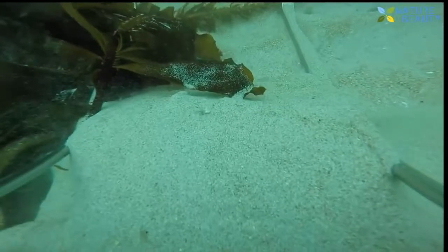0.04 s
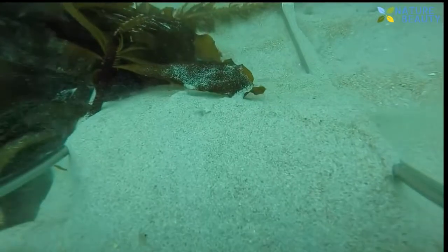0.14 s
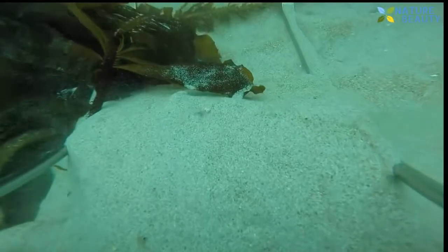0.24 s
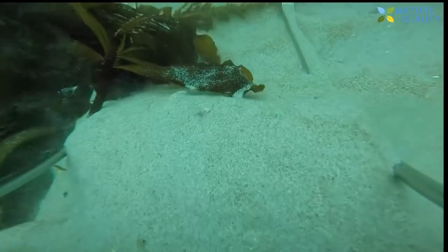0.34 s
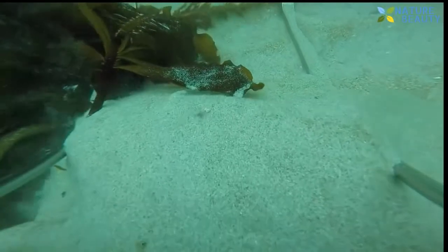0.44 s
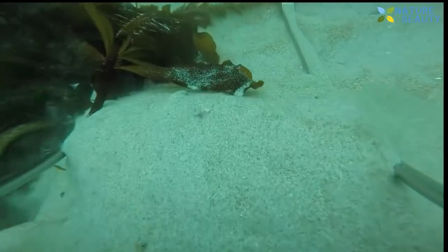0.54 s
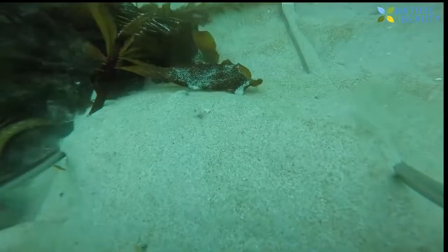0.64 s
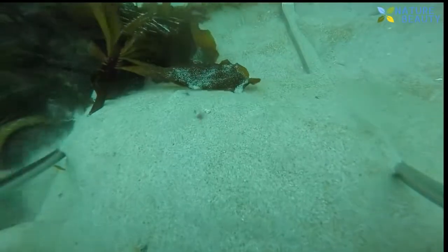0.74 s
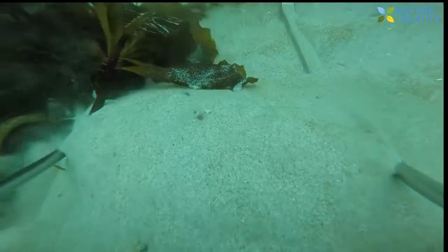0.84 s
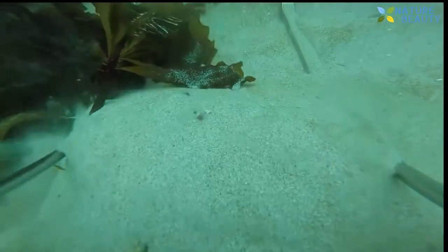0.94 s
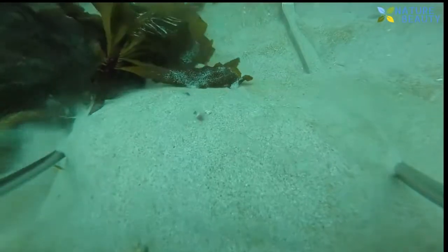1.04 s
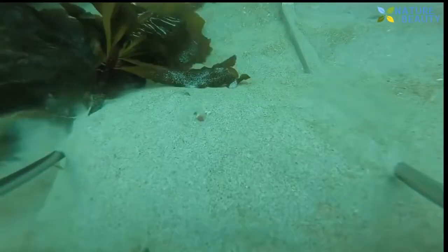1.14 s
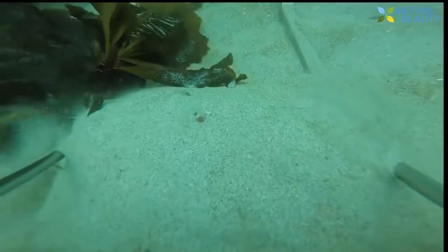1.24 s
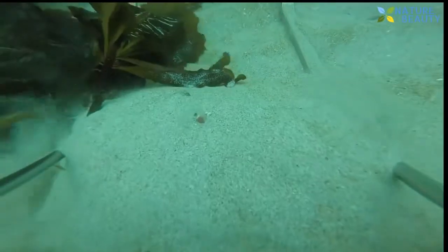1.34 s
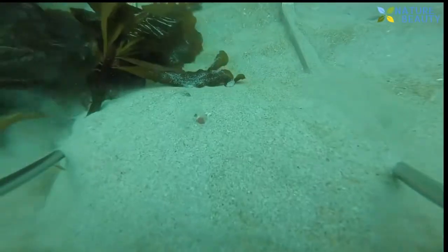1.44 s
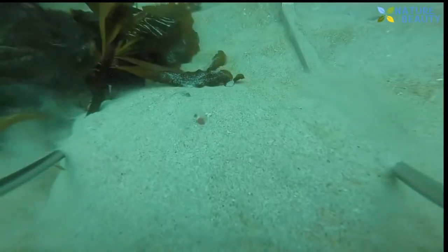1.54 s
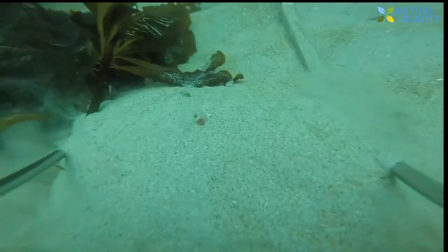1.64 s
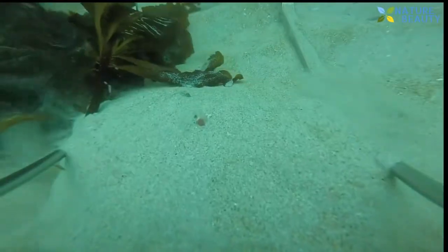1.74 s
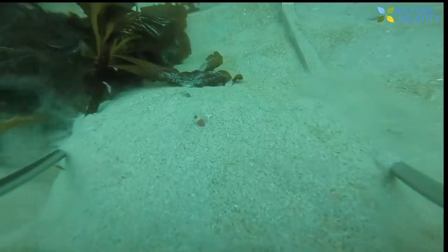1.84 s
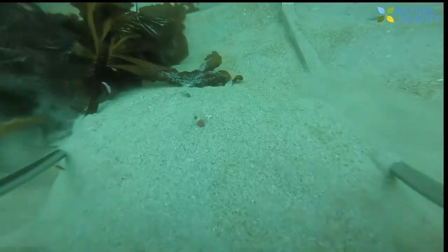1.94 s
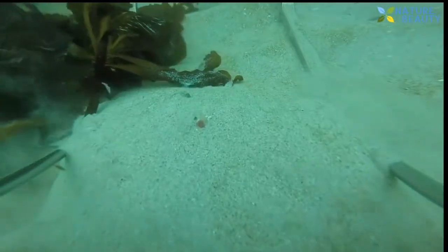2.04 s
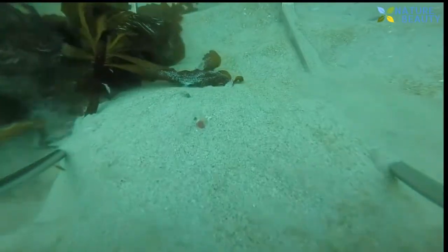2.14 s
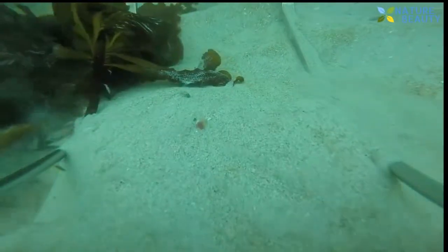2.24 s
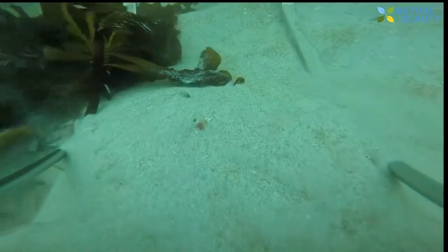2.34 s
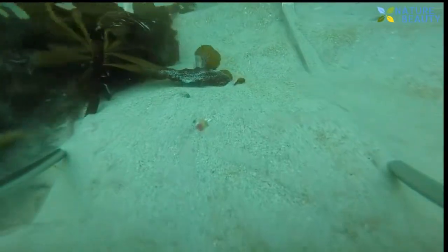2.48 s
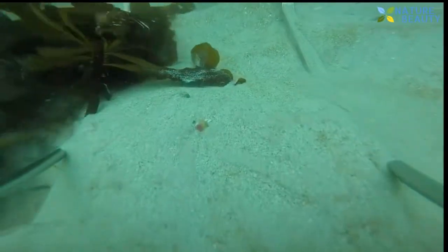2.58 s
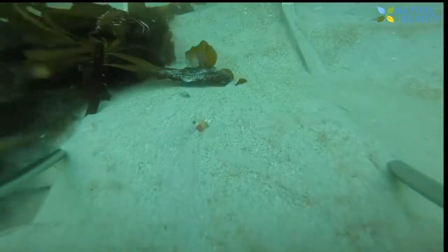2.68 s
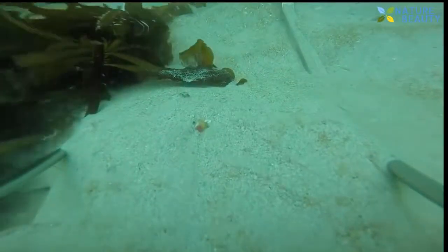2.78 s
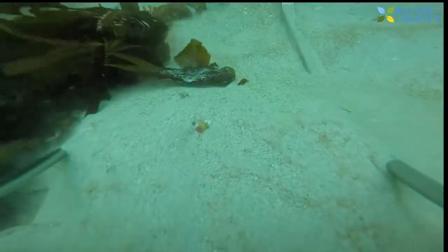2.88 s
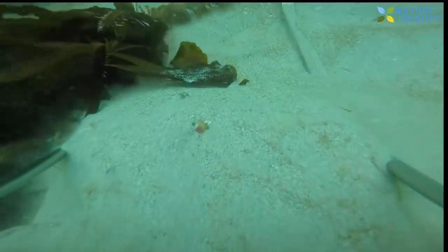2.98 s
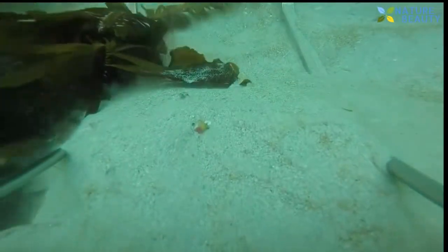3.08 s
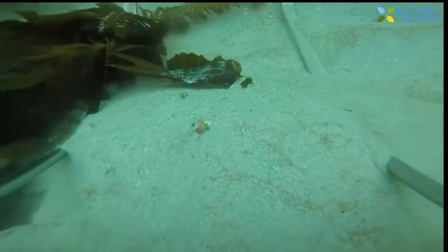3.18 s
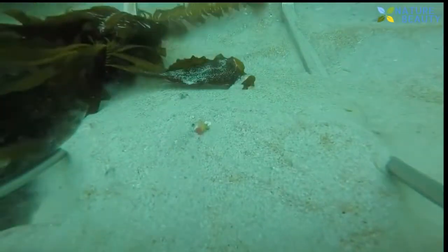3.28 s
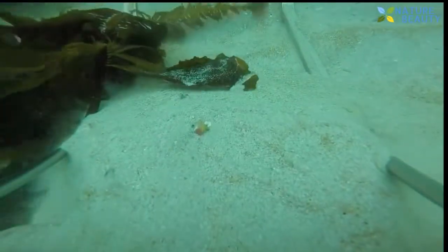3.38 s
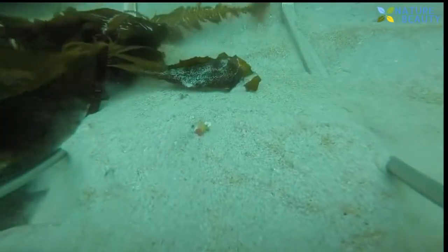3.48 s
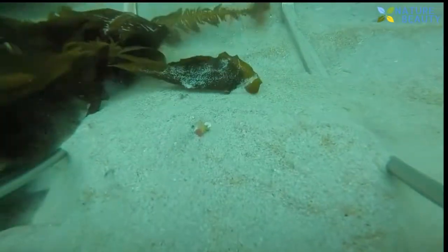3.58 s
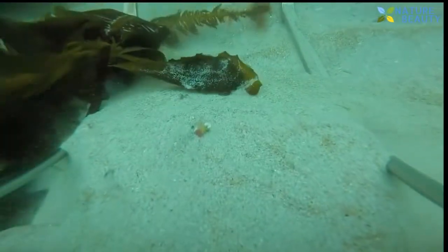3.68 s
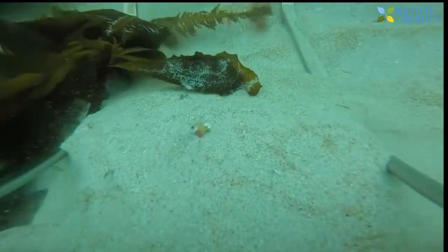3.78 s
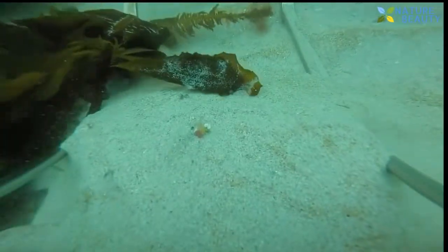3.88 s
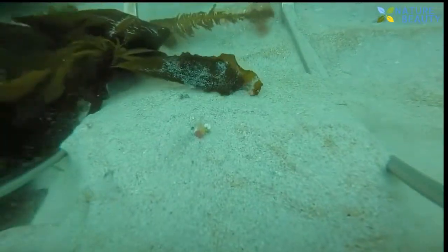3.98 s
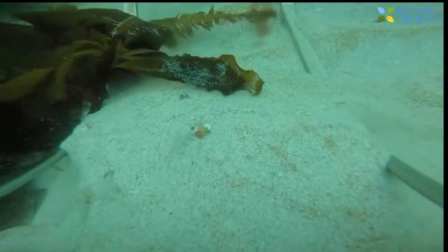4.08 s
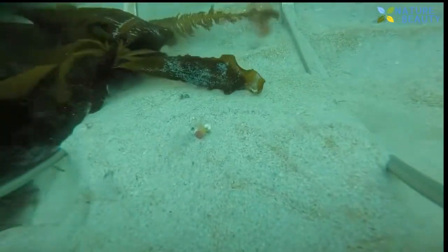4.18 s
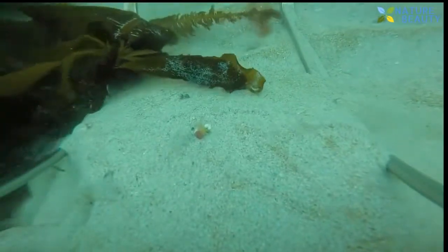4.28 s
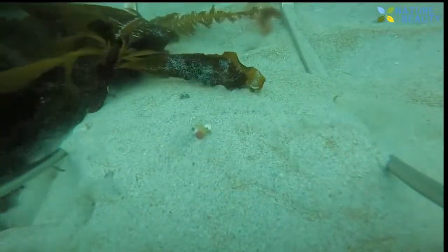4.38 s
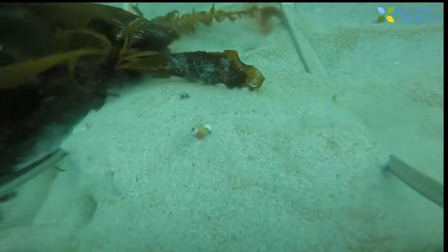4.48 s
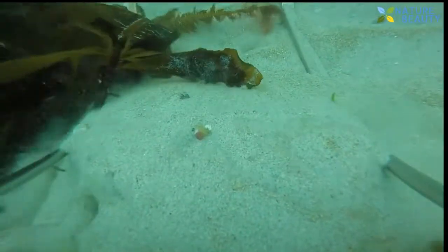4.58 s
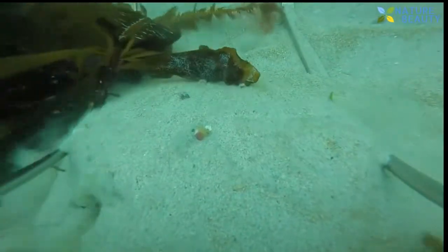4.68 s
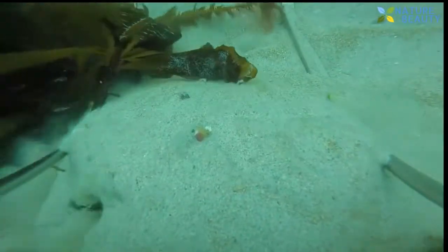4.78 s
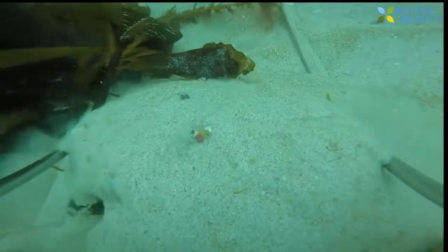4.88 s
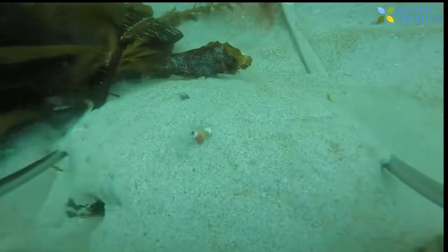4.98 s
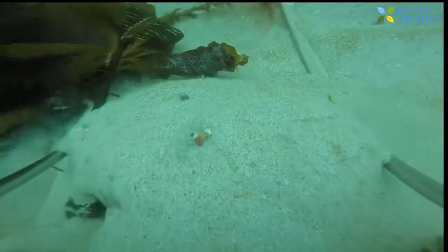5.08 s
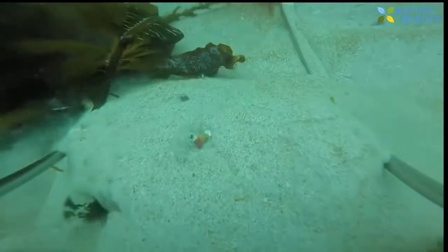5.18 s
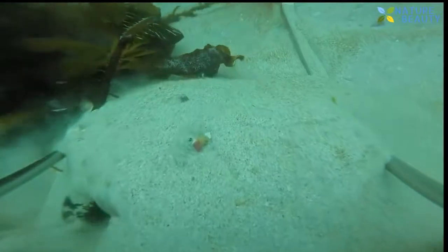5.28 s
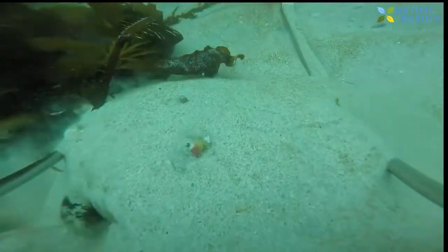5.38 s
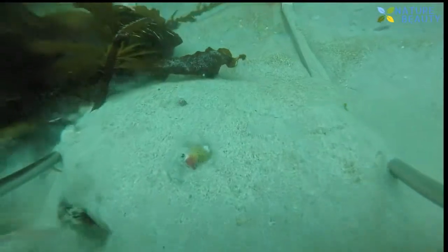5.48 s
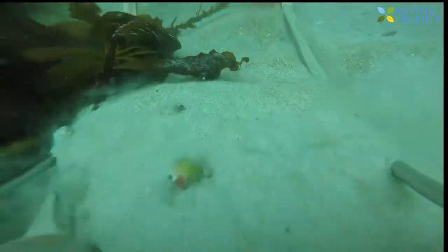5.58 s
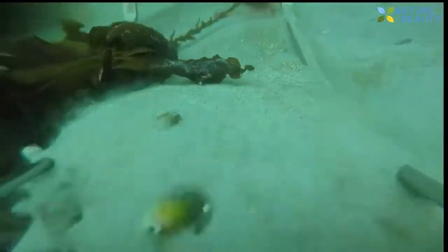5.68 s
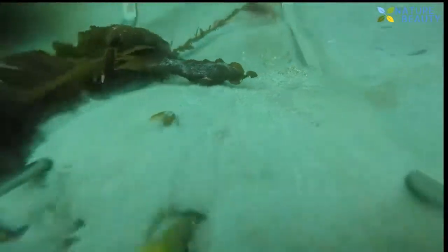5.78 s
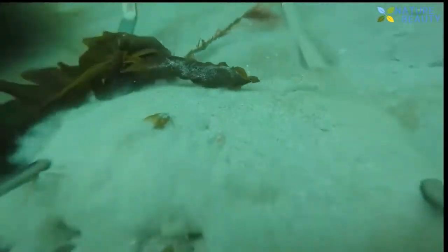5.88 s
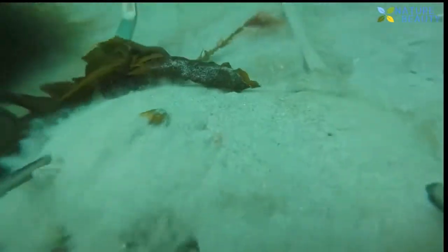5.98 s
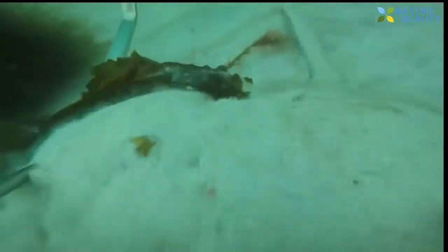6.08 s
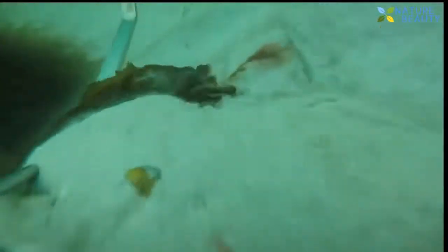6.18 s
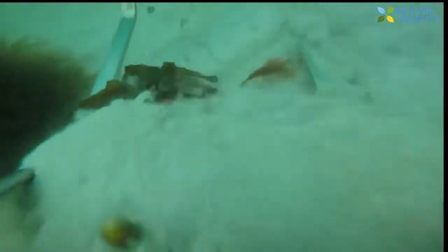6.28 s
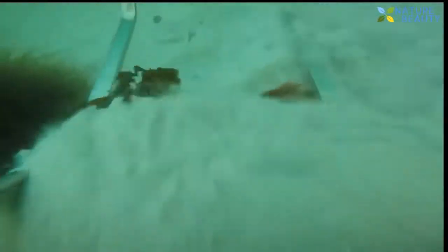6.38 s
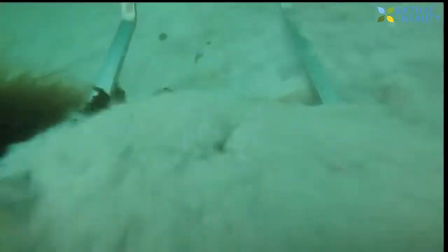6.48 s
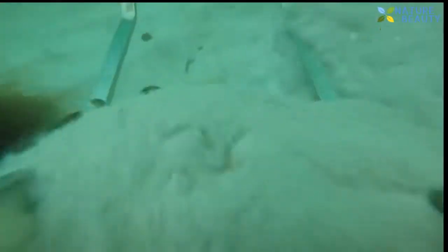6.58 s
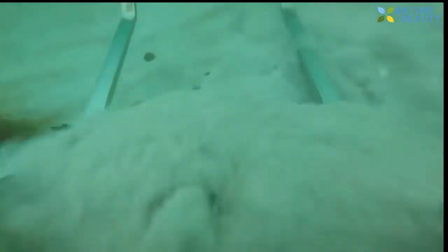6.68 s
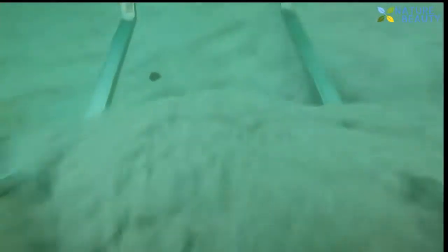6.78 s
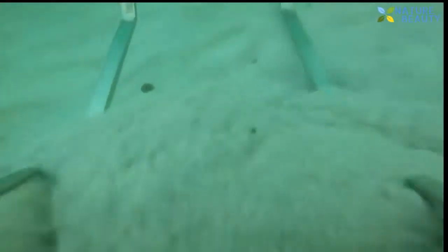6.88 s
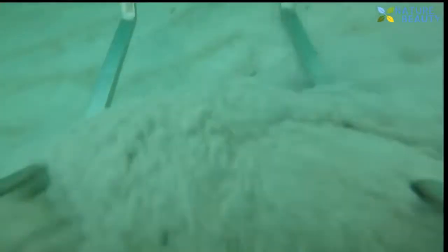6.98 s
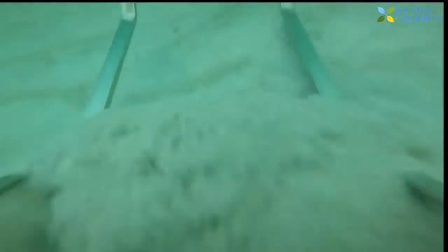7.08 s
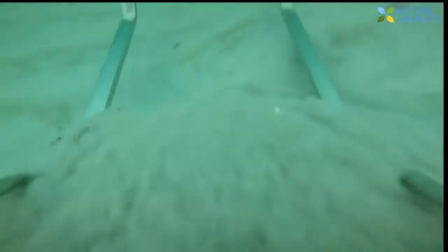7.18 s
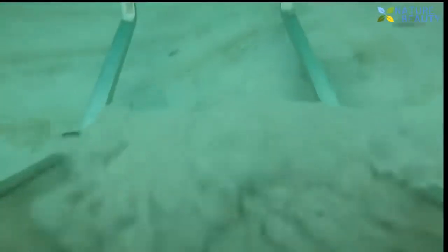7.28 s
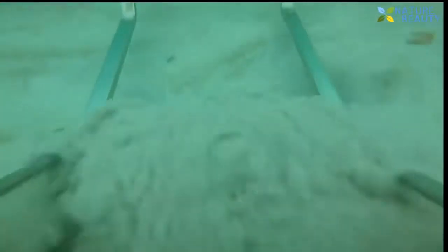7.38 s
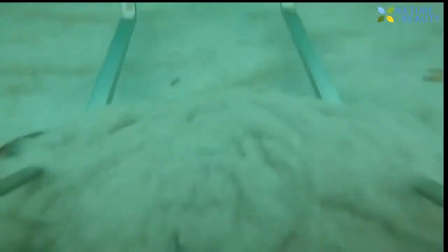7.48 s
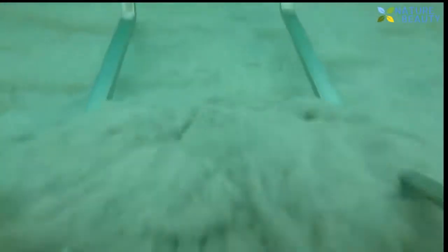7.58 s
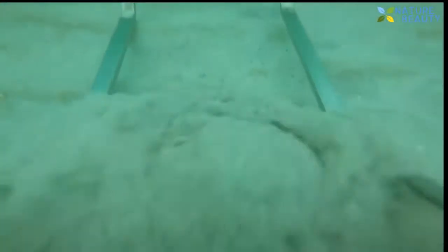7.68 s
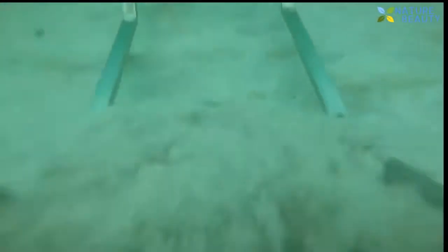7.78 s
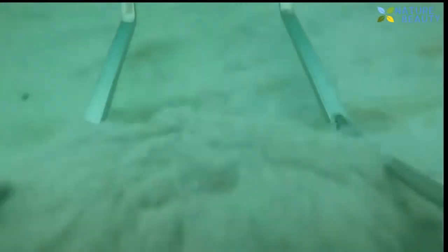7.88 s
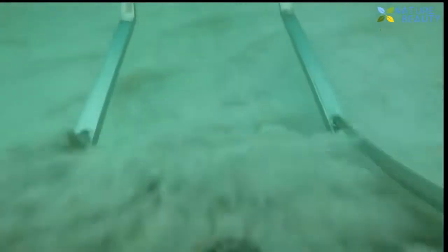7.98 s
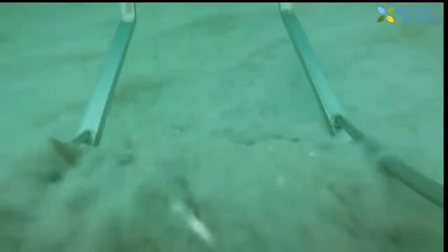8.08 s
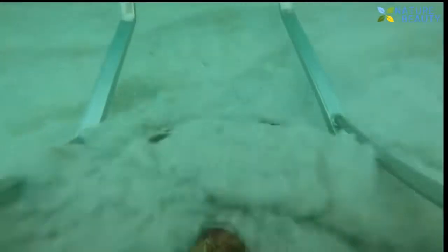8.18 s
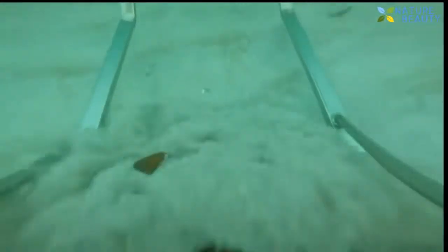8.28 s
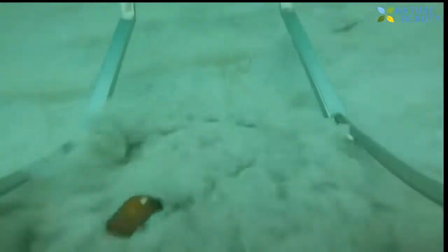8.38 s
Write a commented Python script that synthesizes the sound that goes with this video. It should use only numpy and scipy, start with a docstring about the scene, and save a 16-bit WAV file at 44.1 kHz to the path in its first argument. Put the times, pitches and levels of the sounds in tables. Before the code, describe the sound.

Underwater, a boat engine drones at idle, revs up, then fades beneath loud jerky scraping of steel teeth through sand and sharp shell knocks.

```python
"""Under water, on a clam dredge: the towing boat's engine idles while the teeth scrape through sand,
knock twice near the start and bump softly on buried stones. At about 4.5 s the engine revs up and the
tow takes hold; from 5.2 s the drone sinks away under loud raking. From 5.9 s the teeth go in jerks,
with many knocks on shells and stones and a few squeaks, and the steel frame rings and shudders.
Engine tones are cosines; the rest is mostly noise, grains and blows passed through resonances."""
import sys
import numpy as np
from scipy import signal
from scipy.fft import rfft, irfft
from scipy.io import wavfile
from scipy.ndimage import uniform_filter1d

SR = 44100
rng = np.random.default_rng(int(sys.argv[2]) if len(sys.argv) > 2 else 0)


def log_audio(samples):
    """Write samples as a 16-bit WAV file to the path given in sys.argv[1]."""
    # one column per channel
    frames = np.atleast_2d(samples).T
    # limit to full scale, then quantise
    limited = np.clip(frames, -1, 1)
    pcm = np.round(limited * 32767).astype(np.int16)
    wavfile.write(sys.argv[1], SR, pcm)


N = 372204
TIME = np.arange(N) / SR  # seconds


def amp(db):
    """Turns decibels into a gain."""
    return 10 ** (np.asarray(db) / 20)


def evened(x):
    """Scales a sound to an average (rms) level of one."""
    return x / np.sqrt(np.mean(x ** 2) + 1e-20)


def curve(rows, axis=1):
    """Draws straight lines through one column of a table, giving a value at every sample."""
    columns = np.transpose(rows)
    return np.interp(TIME, columns[0], columns[axis])


def read(points, hz):
    """Reads a (frequency, level) table at any pitch, on a logarithmic frequency axis."""
    point_hz, db = np.transpose(points)
    return np.interp(np.log(hz + 1), np.log(point_hz), db)


def add(mix, start_s, sound):
    """Mixes a short sound in at a given time."""
    part = mix[max(round(start_s * SR), 0):][:len(sound)]
    part += sound[:len(part)]


def band(x, lo_hz, hi_hz):
    """Keeps only the pitches between two limits."""
    return signal.sosfilt(signal.butter(2, [lo_hz, hi_hz], "band", fs=SR, output="sos"), x)


def wander(rate_hz):
    """Slow random drift of unit size: noise with its quick changes smoothed away."""
    hz = np.fft.rfftfreq(N, 1 / SR)
    slow = rfft(rng.standard_normal(N)) * np.exp(-(hz / rate_hz) ** 2)
    return evened(irfft(slow, N))


def response(colour, modes, ring=0.84, size=8192):
    """How a body answers a single tap: a broad colour, lifted at its resonances and faded out."""
    hz = abs(np.fft.fftfreq(size, 1 / SR))
    lifts = sum(lift / (1 + (2 * (hz - mode_hz) / width) ** 2) for mode_hz, width, lift in modes)
    log_gain = np.log(amp(read(colour, hz) + ring * lifts))
    # this phase lets the sound start at the tap, never before it
    spectrum = np.exp(np.conj(signal.hilbert(log_gain)))
    taps = np.fft.ifft(spectrum).real
    return taps[:size // 2] * np.hanning(size)[size // 2:]


def through(x, taps):
    """Passes a sound through a body's response."""
    return signal.oaconvolve(x, taps)[:len(x)]


# the idling engine hunts a little: (time [s], firing rate [firings/s])
IDLE_SPEED = [(0, 42.7), (.65, 42.8), (1.32, 41.4), (1.88, 42.8), (2.15, 42.1), (2.65, 43.5), (3.2, 42.8),
              (3.5, 41.2), (3.72, 41.3), (3.97, 43), (4.4, 42.7)]
# the throttle opens: middle of the run-up [s], its time constant [s], average rate under tow [firings/s]
REV_S, REV_LAG_S, TOW_HZ = 4.515, 0.039, 76.4


def engine_speed(strain=.008):
    """Firings a second: the engine idles, then runs up in one smooth step and wavers under the tow."""
    idle = curve(IDLE_SPEED)
    tow = TOW_HZ * (1 + strain * wander(5))
    throttle = (1 + np.tanh((TIME - REV_S) / (2 * REV_LAG_S))) / 2
    return idle + (tow - idle) * throttle


# colour of the hiss: (frequency [Hz], relative level [dB per Hz])
HISS_COLOUR = [(100, 13), (250, -0.5), (400, -1), (600, -5), (900, -3), (1500, 0.5), (2100, -0.5),
               (2700, -0.5), (3300, 3), (3900, -5), (4500, -17.5), (6800, -26), (8800, -20), (15000, -36)]
# resonances that colour the hiss: (frequency [Hz], width [Hz], lift before the ring factor [dB])
HISS_MODES = [(616, 160, 13.5), (837, 74, 15), (1104, 33, 8), (1990, 250, 8), (3140, 760, 5), (4700, 90, 8),
              (5340, 70, 5.5), (7580, 100, 12), (14300, 320, 15)]
# the hiss between 2800 and 4200 Hz, before the trim: (time [s], level [dB])
HISS_LEVEL = [(0, -47), (.7, -51.5), (1.95, -46), (2.3, -48), (4.3, -49.5), (4.47, -43.5), (5.1, -39.5),
              (5.9, -37.5), (6.12, -63), (8.44, -60)]
# tones of the gears: (multiple of the firing rate, relative level [dB])
GEAR_TONES = [(20, -6.5), (20.5, -13), (26, -7.5)]
# the gear whine as a whole: (time [s], level [dB])
WHINE_LEVEL = [(0, -37.5), (1, -51.5), (2, -54.5), (3, -43.5), (4.1, -40), (4.6, -49), (8.44, -100)]


def machinery(turns, flicker_db=1.2, trim_db=-1.14):
    """Hiss and gear whine of the engine; the hiss chuffs once in every four firings."""
    chuff_db = 2.8 * np.cos(np.pi * turns / 4) ** 4
    noise = rng.standard_normal(N) * amp(chuff_db + flicker_db * wander(54))
    hiss = through(noise, response(HISS_COLOUR, HISS_MODES))
    hiss /= np.std(band(hiss, 2800, 4200))
    whine = np.zeros(N)
    for multiple, db in GEAR_TONES:
        # a random complex size makes the tone waver in strength and phase
        unsteady = wander(32) + 1j * wander(48)
        whine += amp(db) * (unsteady * np.exp(2j * np.pi * multiple * turns)).real
    return amp(curve(HISS_LEVEL) + trim_db) * hiss + amp(curve(WHINE_LEVEL)) * whine / np.sqrt(2)


# the hull booms at one pitch: (frequency [Hz], width [Hz])
HULL_BOOM = (86.5, 43.6)
# an order sitting right on the boom, before throb and sinking: (time [s], level [dB])
HULL_BOOM_LEVEL = [(0, -26.5), (.3, -22), (.47, -27), (.85, -22.5), (2.08, -20.5), (2.17, -26.5),
                   (2.5, -28.5), (2.93, -25.5), (3.3, -22), (4.45, -21.5), (4.88, -21), (5.02, -26)]
# buzz of the engine: (multiple of the firing rate, relative level at idle [dB], at towing speed [dB])
ENGINE_ORDERS = [(1, -3, -9), (2, -19, -2.5), (3, -5, -10.5), (4, -8, -19), (5, -21.5, -16.5)]
BUZZ_DB = -37.5  # added to the relative levels above
# once the teeth bite, the drone sinks away: start [s], rate [dB/s], depth [dB]
SINK_S, SINK_DB_PER_S, SINK_DEPTH_DB = 5.2, 18.5, 35


def drone(speed, turns, flutter=0.086, unsteady=0.44, uneven_db=-27):
    """Orders of the firing rate; the second, and after revving the first, sits on the hull's boom."""
    boom_hz, boom_width_hz = HULL_BOOM
    boom = amp(curve(HULL_BOOM_LEVEL))
    out = np.zeros(N)
    for order, idle_db, towing_db in ENGINE_ORDERS:
        on_boom = 1 / (1 + (2 * (order * speed - boom_hz) / boom_width_hz) ** 6)
        order_db = np.interp(speed, [IDLE_SPEED[0][1], TOW_HZ], [idle_db, towing_db])
        booming = boom * on_boom * (1 + flutter * wander(48))
        buzzing = amp(BUZZ_DB + order_db) * (1 + unsteady * wander(14))
        out += (booming + buzzing) * np.cos(2 * np.pi * (order * turns + rng.random()))
    # unequal cylinders make the drone throb once in four firings
    throb = 1 + 2 * amp(uneven_db) * np.cos(np.pi * turns / 2)
    sunk_db = np.clip(SINK_DB_PER_S * (TIME - SINK_S), 0, SINK_DEPTH_DB)
    return np.sqrt(2) * out * throb * amp(-sunk_db)


# grit sticks and slips along the steel:
# (time [s], length [s], middle pitch [Hz], peak level before trim and scatter [dB])
GRIT_SQUEAKS = [(6.224, .004, 4900, -28.5), (6.363, .008, 3260, -21.5), (6.459, .018, 4860, -32),
                (6.64, .024, 7000, -42), (6.885, .004, 8300, -31), (7.17, .008, 6300, -32),
                (7.803, 0.055, 9100, -40)]


def squeaks(ring_s=0.00075, scatter=0.099, trim_db=-3):
    """Each slip of a grain is one tiny tick at a slightly different pitch."""
    out = np.zeros(N)
    t = TIME[:512]
    tick = t / ring_s * np.exp(1 - t / ring_s)
    for start, length, hz, db in GRIT_SQUEAKS:
        slips = np.arange(0, length, .0042)  # one slip every 4.2 ms, before the random lateness
        for slip, (late, pitch, size) in zip(slips, rng.standard_normal((32, 3))):
            tone = np.sin(2 * np.pi * hz * (1 + scatter * pitch) * t)
            add(out, start + slip + 0.00087 * late, amp(db + trim_db + 2 * size) * tick * tone)
    return out


# resonances of the steel frame, also rung by the scraping and the knocks:
# (frequency [Hz], width [Hz], lift before the ring factor [dB])
FRAME_MODES = [(350, 55, 6), (487, 55, 10), (530, 35, 4), (580, 40, 11), (645, 55, -5), (720, 50, 8),
               (825, 60, 3), (985, 60, 2), (1205, 60, 3), (1890, 170, 9), (2465, 110, 6), (4920, 100, 3),
               (6200, 400, 5), (8650, 900, 5)]
# colour of a bump: (frequency [Hz], relative level [dB per Hz])
DULL_COLOUR = [(60, 12), (130, 8), (250, -18), (420, -23), (560, 4.5), (750, -6.5), (1200, -19.5),
               (2300, -10), (3500, -25), (12000, -61)]
# stones bump softly under the sand: (time of the middle [s], level [dB])
STONE_BUMPS = [(1.071, -30), (1.15, -27.5), (1.499, -37), (1.85, -31.5), (2.05, -32), (2.17, -31),
               (2.41, -32), (4.5, -35), (4.789, -33.5)]


def bumps(length_s=0.063):
    """A buried stone pushes on a tooth: a dull swell of noise in the frame's low resonances."""
    out = np.zeros(N)
    taps = response(DULL_COLOUR, FRAME_MODES)
    swell = np.hanning(int(length_s * SR))
    for middle, db in STONE_BUMPS:
        ring = through(rng.standard_normal(SR // 4), taps)[-len(swell):]
        add(out, middle - length_s / 2, amp(db) * swell * evened(ring))
    return out


# the steady drag through the sand:
# (time [s], level of the scraping before its trim [dB], level of the frame's shudder [dB])
STEADY_DRAG = [(0, -29, -28.5), (.2, -30, -38), (.75, -37.5, -36), (1.3, -39.5, -40), (1.7, -55, -52),
               (2.1, -37.5, -34), (2.7, -41, -45), (3.9, -40.5, -45), (4.45, -45.5, -48), (5.18, -32, -29),
               (5.42, -22, -21), (5.84, -14.5, -17.5), (6.04, -27.5, -28), (6.11, -44, -33),
               (6.27, -41.5, -33), (6.4, -31.5, -24.5), (7.8, -33.5, -27.5), (8.3, -38.5, -32)]
# the teeth catch and tear free, levels before the sag:
# (start [s], length [s], level of the scraping before its trim [dB], level of the shudder [dB])
TOOTH_JERKS = [(5.925, 0.094, -21, -17), (6.313, 0.11, -27.5, -20), (6.511, 0.14, -23.5, -16.5),
               (6.69, 0.061, -25.5, -17.5), (6.813, .14, -15.5, -15), (6.983, 0.022, -21.5, -14),
               (7.022, 0.026, -20.5, -24), (7.168, 0.059, -27, -17), (7.335, 0.14, -24, -17),
               (7.588, 0.017, -24, -21), (7.606, 0.0096, -33, -5.5), (7.735, 0.1, -21, -19.5),
               (7.898, 0.031, -25, -28), (7.966, 0.044, -27, -23), (8.09, .075, -28, -22),
               (8.339, 0.18, -24, -19)]
SAG_DB_PER_S = 23


def effort(rise_s, release_s, axis):
    """Steady drag plus jerks, each gripping, sagging and letting go; axis 1 is the sand, 2 the frame."""
    power = amp(curve(STEADY_DRAG, axis=axis)) ** 2
    t = TIME[:SR // 2]
    for start, length, *levels_db in TOOTH_JERKS:
        grip = np.minimum(t / rise_s, 1)
        release = np.exp(-np.maximum(t - length, 0) / release_s)
        level = amp(levels_db[axis - 1] - SAG_DB_PER_S * t)
        add(power, start, (grip * release * level) ** 2)
    return np.sqrt(power)


# colour of the shudder: (frequency [Hz], relative level [dB per Hz])
SWAY_COLOUR = [(12, -51), (24, 13), (33, 9), (42, 19.5), (55, 16), (70, -3.5), (110, -7), (150, -3),
               (240, -52.5)]
SWAY_RISE_S, SWAY_RELEASE_S = 0.043, 0.034


def shudder(steadiness=0.8):
    """The heavy frame sways on its teeth as the sand grips and gives way: low, partly steadied noise."""
    noise = rng.standard_normal(N)
    sway = signal.hilbert(through(noise, response(SWAY_COLOUR, [], size=32768)))
    swing = uniform_filter1d(abs(sway), size=2000)
    steadied = evened(sway.real / swing ** steadiness)
    return effort(SWAY_RISE_S, SWAY_RELEASE_S, axis=2) * steadied


# teeth hit shells and stones, levels before scaling in thumps() and knocks():
# (time [s], peak level [dB], lift of the treble [dB], lift of the low ring [dB], level of the thump [dB])
TOOTH_KNOCKS = [(0.021, -19.5, 11, 4, -40), (0.653, -29.5, 5, -16, -44), (5.419, -17, 6, 6, -18),
                (5.508, -11, -26, -22, -14), (5.642, -15, -1, -12, -17.5), (5.976, 0, 5.5, -0.5, -10),
                (6.014, -10, -1, 21, -38), (6.042, -5.5, 3.5, 9, -19.5), (6.083, -27.5, 10, 4, -36),
                (6.137, -23.5, -12, 4, -45), (6.367, -12, 4, 6, -23), (6.376, -15, -1, 19, -20),
                (6.427, -14.5, 2, -5.5, -34), (6.509, -12.5, 5, 1, -25), (6.542, -12.5, 5, 7, -18.5),
                (6.572, -11, -5, -8, -24), (6.609, -16.5, 3, -7, -22), (6.82, -21, 11, 7, -24),
                (6.874, -10.5, 6, 33, -43), (6.979, -3, 1, 6, -12.5), (7.163, -13.5, 3, 0.5, -25),
                (7.204, -13, 1, 3, -40), (7.274, -13, -1, -5.5, -22), (7.323, -9, -6, -3.5, -26.5),
                (7.355, -11, 0, 5, -21), (7.392, -12, 11, 12, -22), (7.419, -10.5, 5, 8, -37),
                (7.445, -12.5, 8, 0, -27), (7.579, -10, 3.5, 8, -21), (7.628, -10, 5, 2.5, -36),
                (7.729, -6, 3, 4, -11.5), (7.741, -4, 20, 16, -15), (7.769, -17, 1, 8, -32),
                (7.896, -13.5, 1, -2.5, -42), (7.961, -11.5, -4, -1, -26), (7.993, -16.5, -5, 13, -31),
                (8.051, -20, -3, -3, -44), (8.088, -17.5, -1, -2, -27), (8.099, -16.5, 5, 4.5, -24),
                (8.413, -2.5, 6.5, 3, -28)]


def thumps(hz=88, trim_db=5):
    """Each knock also jolts the whole frame: a short low tone, up to half an octave off the middle pitch."""
    out = np.zeros(N)
    t = TIME[:4096]
    swell = t / .006 * np.exp(1 - t / .006)  # fullest after 6 ms
    for (start, *_, db), chance in zip(TOOTH_KNOCKS, rng.random(len(TOOTH_KNOCKS))):
        tone = np.sin(2 * np.pi * hz * 2 ** (chance - .5) * t)
        add(out, start, amp(db + trim_db) * swell * tone)
    return out


# colour of a knock: (frequency [Hz], relative level [dB per Hz])
BLOW_COLOUR = [(30, -12), (120, -3), (240, -5.5), (380, -1.5), (550, 2), (900, 3.5), (1500, -8.5),
               (2400, -7), (3300, -15.5), (4500, -24.5), (7500, -38), (12000, -35), (15500, -50)]
# weight of the first sharp strike in a knock, against the cracking that follows
STRIKE = 1.5


def knocks(crack_s=0.0041, debris_s=0.015, debris=0.2, shell_db=7, crest_db=7):
    """A sharp strike, then a shell cracks and crumbles; heavy stones ring the low modes more."""
    out = np.zeros(N)
    t = TIME[:4096]
    hz = np.fft.rfftfreq(2 * len(t), 1 / SR)
    treble = 1 / (1 + (3500 / (hz + 1)) ** 4)
    low = 1 / (1 + (hz / 900) ** 4)
    crumble = np.exp(-t / crack_s) + debris * np.exp(-t / debris_s)
    taps = response(BLOW_COLOUR, FRAME_MODES, ring=1.49)
    fade = np.hanning(2 * len(t))[len(t):]
    for start, peak_db, treble_db, low_db, _ in TOOTH_KNOCKS:
        force = rng.laplace(size=len(t)) / np.sqrt(2) * crumble
        force[:3] += STRIKE * np.array([.5, 1, .5])
        # every shell adds one resonance of its own
        shell_hz = 450 * 6 ** rng.random()
        shell = shell_db / (1 + (10 * (hz / shell_hz - 1)) ** 2)
        colour = amp(shell + treble * treble_db + low * low_db)
        blow = irfft(rfft(through(force, taps), 2 * len(t)) * colour)[:len(t)] * fade
        # the first 10 ms are set to an average crest_db below the wanted peak
        add(out, start, amp(peak_db - crest_db) * blow / np.std(blow[:SR // 100]))
    return out


# colour of the sand: (frequency [Hz], relative level [dB per Hz])
GRAIN_COLOUR = [(60, 9.5), (140, 6.5), (240, -11.5), (400, -7.5), (550, 1.5), (900, -2), (1500, -12),
                (2100, -6), (3200, -19.5), (4200, -26.5), (7300, -38), (9500, -38), (13000, -53),
                (15500, -48.5)]
# a jerk grips the sand quickly, and the sand falls quiet sooner than the frame does
GRIP_S, SAND_RELEASE_S = 0.0095, .011


def scrape(grains_per_s=2000, spread_db=2.0, smooth=0.63, clump_db=1.5, chips_per_s=90, chip=8, trim_db=-4.0):
    """Sand grains and a few coarser chips of shell crack against the teeth and ring the frame."""
    size = amp(spread_db * np.minimum(rng.exponential(1, N), 4))
    grains = evened(size * rng.choice([-1, 1], N) * (rng.random(N) < grains_per_s / SR))
    chips = chip * rng.choice([-1, 1], N) * (rng.random(N) < chips_per_s / SR)
    clumps = amp(clump_db * wander(69))
    drive = evened((grains + chips + smooth * rng.standard_normal(N)) * clumps)
    taps = response(GRAIN_COLOUR, FRAME_MODES)
    taps /= np.linalg.norm(band(taps, 450, 2400))
    return through(drive * amp(trim_db) * effort(GRIP_S, SAND_RELEASE_S, axis=1), taps)


def scene():
    """Engine from afar, dredge close by."""
    speed = engine_speed()
    turns = np.cumsum(speed) / SR  # firings so far
    engine = machinery(turns) + drone(speed, turns)
    dredge = squeaks() + bumps() + shudder() + thumps() + knocks() + scrape()
    return (engine + dredge)[None]


EDGE_HZ = 15500


def record(dry):
    """The camera fixed to the frame flattens the highest peaks, then cuts the treble above EDGE_HZ."""
    flattened = dry / (1 + (dry / .7) ** 8) ** (1 / 8)  # never passes 0.7
    treble_cut = signal.firwin(401, EDGE_HZ, window=("kaiser", 9), fs=SR)
    return signal.oaconvolve(flattened, treble_cut[None], "same")


dry = scene()
out = record(dry)
log_audio(out)
```